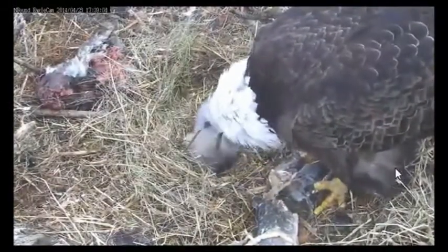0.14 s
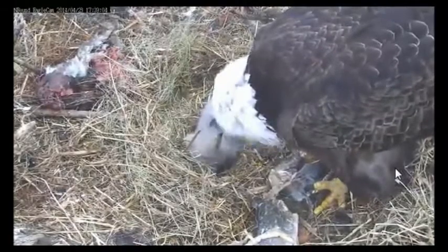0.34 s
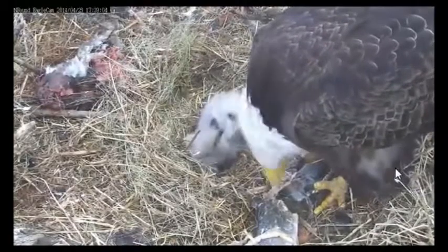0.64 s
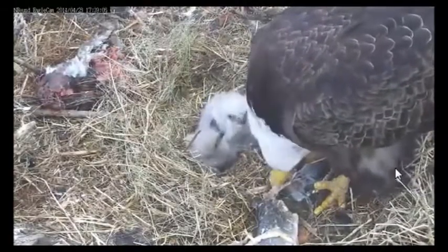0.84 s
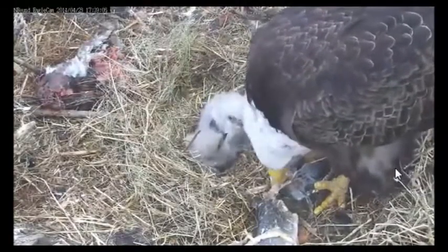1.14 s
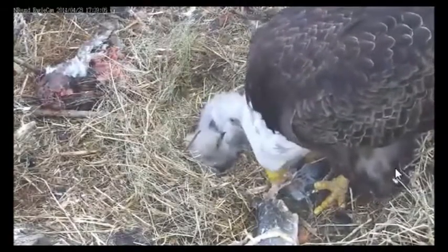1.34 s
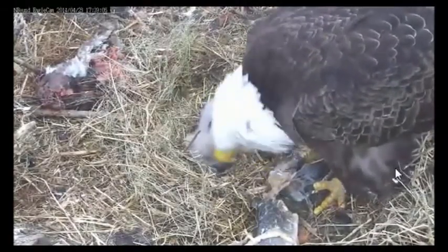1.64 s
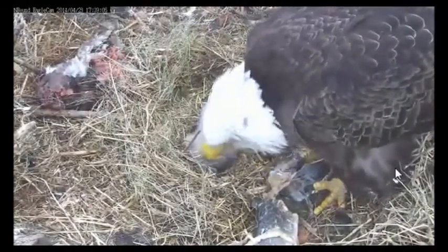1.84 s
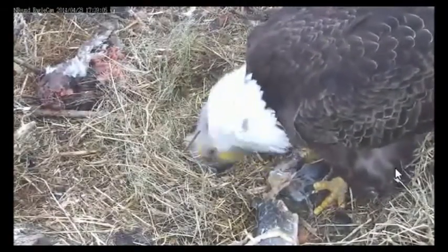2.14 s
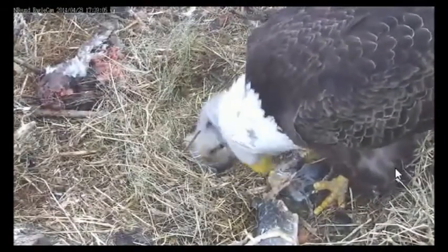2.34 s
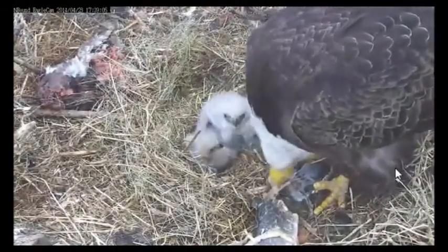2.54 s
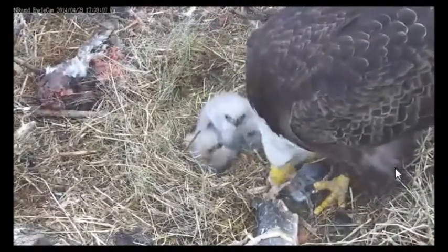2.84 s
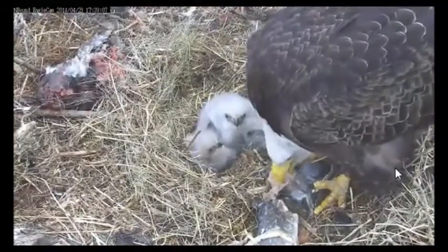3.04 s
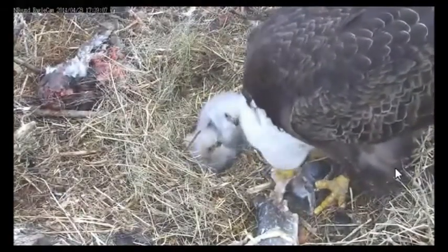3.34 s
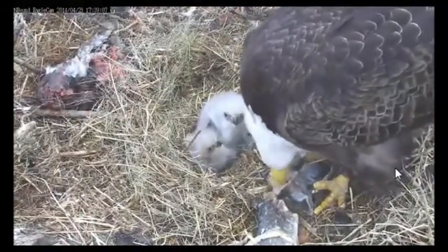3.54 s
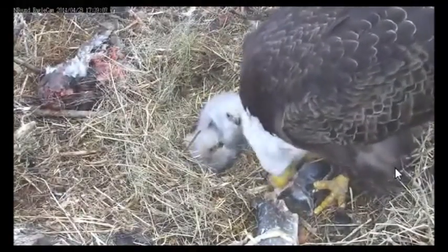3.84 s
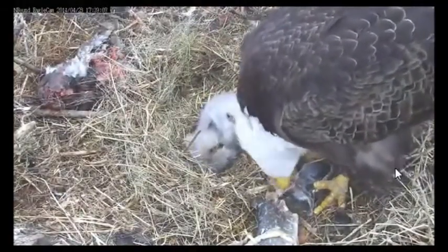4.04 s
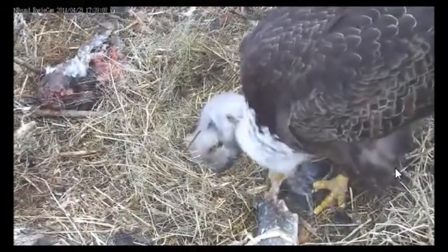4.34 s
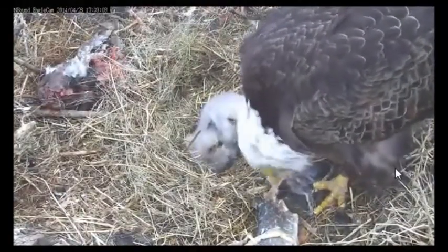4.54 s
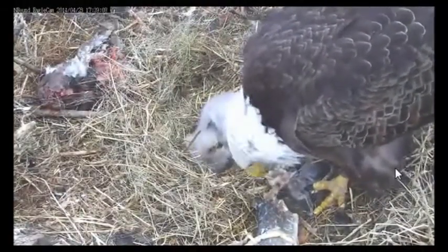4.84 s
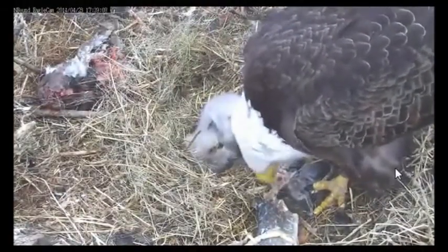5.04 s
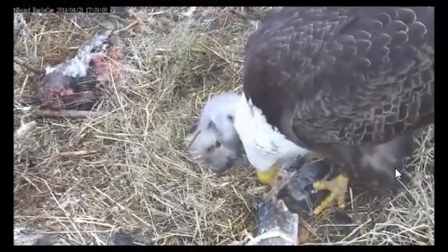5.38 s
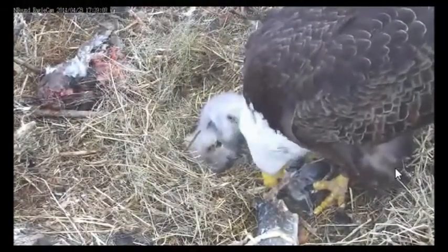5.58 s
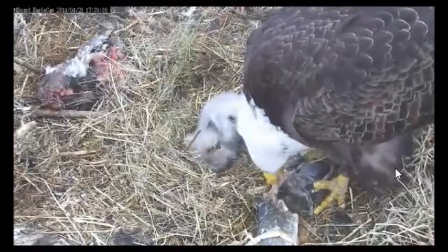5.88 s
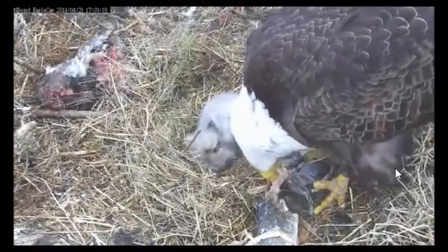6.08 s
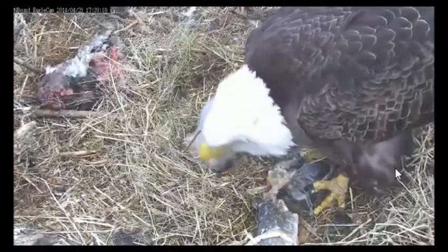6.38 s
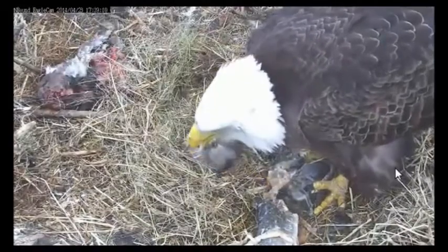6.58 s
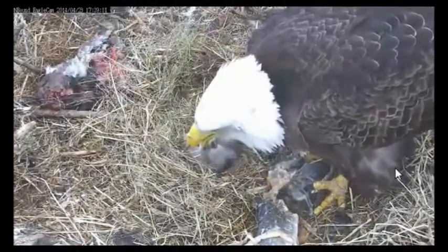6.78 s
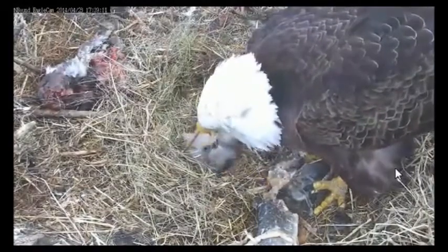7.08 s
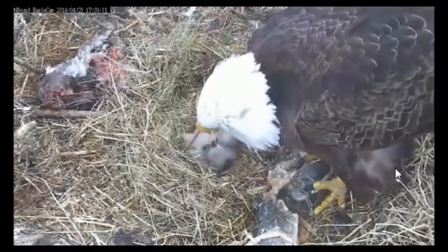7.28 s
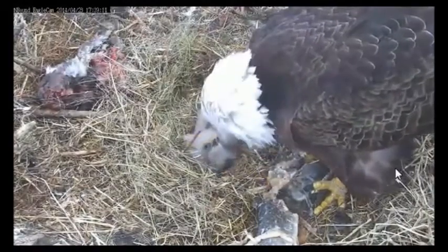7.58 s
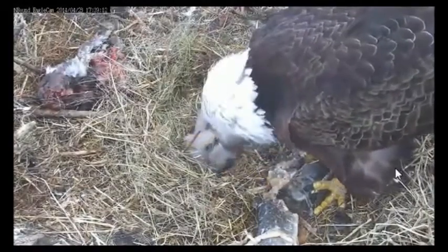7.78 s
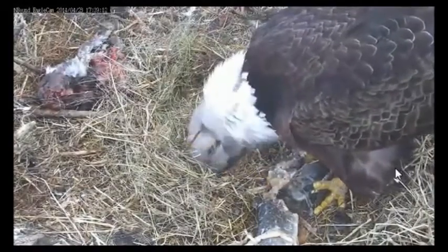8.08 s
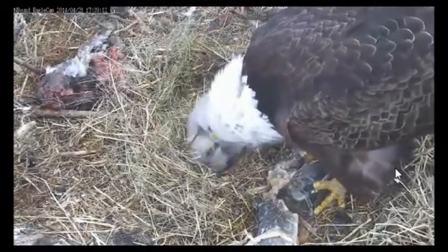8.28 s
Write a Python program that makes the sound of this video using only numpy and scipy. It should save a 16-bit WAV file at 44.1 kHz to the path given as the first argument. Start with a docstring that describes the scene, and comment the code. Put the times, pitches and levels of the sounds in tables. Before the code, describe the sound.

An eagle chick peeps in an outdoor straw nest while wind rumbles on the microphone and branches roar softly. After a short falling peep at the start, high, slightly hoarse calls come about once a second from 0.7 to 5.5 seconds, each rising and then dropping, with a light echo. Lower, wavering peeps follow near 6 and 8 seconds, with a faint one between. Straw rustles throughout, and small sharp snaps of straw or bone are scattered through as the parent tears at food. Gusts hit with dull thumps, strongest around 2.1, 3, 4.4 to 4.9 and 7.5 seconds, and a faint thin whine swells with them. The sound itself ticks now and then from 1.4 seconds, has very brief dips from 2 seconds on, and cuts out once from about 4.6 to 4.8 seconds.

```python
"""An eagle chick peeps in a straw nest while a parent tears at food. From the start, gusts shake the
microphone, branches roar softly, straw rustles and a thin whine swells with the wind. Soon straw and
bone snap, and from 1 s on swirls of air thump the microphone. The link that carries the sound ticks
at 1.4 s, dips from 2 s on and cuts out once near 4.6 s. Near 6 s and 8 s the chick gives lower peeps."""
import sys
import numpy as np
from scipy import signal
from scipy.io import wavfile
from scipy.ndimage import uniform_filter1d

SR = 44100
rng = np.random.default_rng(int(sys.argv[2]) if len(sys.argv) > 2 else 0)


def waveform_to_disk(signal):
    """Save audio, clipped to [-1, 1], as 16-bit WAV at the path in sys.argv[1]."""
    frames = np.transpose(np.atleast_2d(signal))
    scaled = np.clip(frames, -1, 1) * 32767
    samples = np.round(scaled).astype(np.int16)
    wavfile.write(sys.argv[1], SR, samples)


N = 371275
TIME = np.arange(N) / SR
CALM_DB = -27  # gusts are compared with this wind level
# wind on the microphone, in two stretches: t/s, level/dB
GUST_LEVELS = [
    [(0, -32), (.14, -35.5), (.48, -35.5), (.56, -31.5), (1.0, -33.5), (1.25, -29), (1.6, -33),
     (2.04, -27.5), (2.16, -20), (2.35, -22.5), (2.8, -30), (2.92, -23.5), (3.08, -19), (3.2, -23.5),
     (3.6, -30.5), (3.85, -37.5), (4.2, -28.5), (4.39, -27), (4.42, -20.5), (4.55, -20)],
    [(4.78, -20.5), (4.9, -21.5), (4.96, -26.5), (5.3, -29.5), (5.55, -30.5), (5.72, -25), (6.3, -25),
     (7.35, -28.5), (7.44, -21), (7.72, -24), (7.8, -28), (8.05, -24), (8.42, -35.5)],
]
# sounds around the nest: t/s, branch roar/dB, straw rustle/dB
NEST_LEVELS = [(0, -50, -51), (.6, -48.5, -52.5), (1.85, -46.5, -54), (2.1, -49.5, -46.5),
               (2.6, -48.5, -59), (3.1, -47, -50), (3.8, -46.5, -61.5), (4.35, -46, -43),
               (4.95, -47.5, -48.5), (5.6, -41, -48.5), (6.1, -42, -44), (7.1, -43.5, -47.5),
               (8, -44.5, -44.5), (8.42, -43, -45.5)]


def gain_of(db):
    return 10 ** (np.asarray(db) / 20)


def unit_level(x):
    """Scales a signal to an average power of 1."""
    return x / np.sqrt(np.mean(abs(x) ** 2) + 1e-20)


def level_at(points, hz):
    """Reads a curve of f/Hz, level/dB at the given frequencies."""
    f, db = np.transpose(points)
    return np.interp(np.log(hz + 1), np.log(f + 1), db)


def curves(tables):
    """Joins tables that start with t/s and reads each other column at every sample."""
    s, *columns = np.vstack(tables).T
    return [np.interp(TIME, s, column) for column in columns]


def drift(hz, count=N):
    """A smooth random wobble; a higher hz makes it faster."""
    span = int(SR / hz)
    return unit_level(uniform_filter1d(uniform_filter1d(rng.standard_normal(count), span), span))


def add(mix, s, sound):
    mix[round(s * SR):][:len(sound)] += sound


def stereo(mid, side):
    """Left and right share the mid and differ by the side."""
    return np.array([mid + side, mid - side])


def low_pass(x, hz):
    return signal.oaconvolve(x, signal.firwin(511, hz, window=("kaiser", 9), fs=SR)[None], "same")


def noise(spectrum, patchy_db, size=512):
    """Stereo noise shaped by a spectrum, with narrow, lingering loud and soft patches."""
    # how much left and right differ: f/Hz, side compared with mid/dB
    width = [(40, -16.5), (120, -18.5), (400, -40), (1200, -24), (2500, -21.5), (4500, -10.5), (7500, -6.5)]
    hop = size // 4
    frames, hz = N // hop + 5, np.fft.rfftfreq(size, 1 / SR)
    a, b, c, d, patches = rng.standard_normal((frames, len(hz), 5)).T
    patches = unit_level(uniform_filter1d(uniform_filter1d(patches, size=3, axis=0), size=16, axis=1))
    mid, side = a + 1j * b, gain_of(level_at(width, hz))[:, None] * (c + 1j * d)
    shaped = stereo(mid, side) * gain_of(level_at(spectrum, hz)[:, None] + patchy_db * patches)
    return unit_level(signal.istft(shaped, nperseg=size, noverlap=size - hop)[1][:, :N])


def peep(rows, rough, octave_db=-37):
    """Two close voices pulse against each other and turn hoarse when the pitch slides fast."""
    s, hz, db = np.transpose(rows)
    t = np.arange(s[0], s[-1], 1 / SR)
    n = len(t)
    pitch = uniform_filter1d(np.interp(t, s, hz), size=400)
    hoarse = np.clip(abs(np.gradient(pitch)) * SR / 25000, 0, 1) ** 2
    waver = .013 * rough * drift(90, n) + .02 * hoarse * drift(300, n)
    phase = 2 * np.pi * np.cumsum(pitch * (1 + waver)) / SR
    apart_hz = 42 * gain_of(4 * drift(40, n))  # the gap between the voices sets the pulse rate
    strength = np.clip(.5 + .6 * rough + .3 * drift(30, n), 0, 1.1)
    second_voice = strength * np.exp(2j * np.pi * (np.cumsum(apart_hz) / SR + rng.random()))
    flutter = 1 + .55 * rough * (drift(130, n) + .5j * drift(130, n))
    pulse = (1 + second_voice) * flutter
    breath = (.45 * rough ** 2 + .3 * hoarse) * (drift(900, n) + 1j * drift(900, n))
    voice = unit_level(2 * pulse / np.sqrt(4 + abs(pulse) ** 2) + breath)  # loud parts level off
    swell = unit_level(gain_of(3 * rough * drift(45, n)))
    tone = (voice * np.exp(1j * phase)).real + gain_of(octave_db) * (voice * np.exp(2j * phase)).real
    return np.sqrt(2) * gain_of(np.interp(t, s, db)) * swell * tone * signal.windows.tukey(n, .02)


def chick():
    """The chick's clear peeps echo off far trunks, with fainter scraps of peeping among them."""
    # peeps, most rising and then falling: roughness/0-1, rows of (t/s, f/Hz, level/dB)
    high_peeps = [ (.47, [(0, 4610, -41.5), (.066, 4410, -37.5), (.09, 4130, -43), (.128, 2980, -46.5)]),
                  (.5, [(.688, 3040, -40), (.716, 3320, -37), (.77, 3400, -39), (.782, 3860, -51),
                  (.81, 3890, -53), (.83, 4140, -67), (.856, 4170, -40), (.905, 4330, -44),
                  (.925, 4350, -33.5), (.97, 4500, -45), (1.03, 4570, -41), (1.085, 4700, -31.5),
                  (1.11, 4680, -28.5), (1.15, 4570, -39), (1.19, 3220, -40.5)]), (.6, [(1.777, 3096, -31),
                  (1.805, 3350, -41), (1.835, 3493, -31), (1.87, 3460, -42), (1.915, 3610, -44),
                  (1.945, 3790, -40), (1.99, 4070, -57), (2.04, 4440, -45), (2.143, 4590, -42),
                  (2.175, 4760, -36), (2.221, 4820, -41), (2.255, 4690, -40), (2.3, 3200, -42)]),
                  (.7, [(2.792, 3120, -43), (2.822, 3440, -34), (2.866, 3550, -51), (2.9, 3650, -36),
                  (2.94, 3790, -43.5), (2.99, 4050, -42.5), (3.02, 4580, -42.5), (3.076, 4525, -37.5),
                  (3.11, 4570, -37), (3.2, 4790, -44), (3.266, 4680, -34), (3.288, 4610, -46),
                  (3.328, 3150, -40)]), (.7, [(3.806, 3100, -42), (3.828, 3500, -37), (3.873, 3724, -36.5),
                  (3.916, 3720, -32), (3.93, 4170, -38), (3.96, 4280, -48), (4.03, 4720, -44),
                  (4.05, 4740, -46), (4.1, 4760, -37), (4.15, 4850, -40.5), (4.185, 5120, -41),
                  (4.205, 4960, -34), (4.229, 5190, -36.5), (4.26, 4600, -32.5), (4.285, 4496, -43),
                  (4.32, 3110, -45)]), (.5, [(4.998, 3180, -40), (5.018, 3326, -34.5), (5.09, 3520, -38),
                  (5.12, 3550, -36), (5.145, 3820, -36), (5.168, 3740, -35), (5.194, 4200, -42),
                  (5.225, 4470, -35), (5.26, 4350, -37.5), (5.32, 4450, -49), (5.34, 4520, -32.5),
                  (5.36, 4620, -48), (5.436, 4580, -36), (5.466, 3700, -36.5), (5.5, 3033, -44)]),
                  (0.9, [(7.128, 3330, -48), (7.15, 3860, -49), (7.21, 4130, -40.5), (7.228, 4240, -49),
                  (7.252, 4280, -41.5), (7.29, 4300, -46), (7.31, 4420, -48), (7.34, 4440, -46),
                  (7.375, 4100, -47)]), ]
    # lower, wavering peeps, each in rows of: t/s, f/Hz, level/dB
    low_peeps = [
        [(5.848, 3230, -38), (5.885, 3470, -29), (5.903, 3480, -43), (5.93, 3350, -25), (5.975, 3460, -29.5),
         (6.005, 3213, -33.5), (6.069, 3213, -35), (6.109, 3590, -36.5), (6.155, 3450, -31.5),
         (6.19, 3330, -35), (6.215, 3330, -41), (6.24, 3750, -44)],
        [(8.045, 3401, -36.5), (8.083, 3495, -32.5), (8.129, 3398, -36), (8.237, 3440, -35.5),
         (8.37, 3196, -34), (8.404, 3120, -43)],
    ]
    # the overtone an octave above each low peep: level compared with the main tone/dB
    low_octaves = [-17, -28]
    # faint scraps: t/s, length/s, first f/Hz, last f/Hz, level/dB
    scraps = [(0.063, 0.13, 4690, 4640, -47.5), (0.922, 0.16, 3480, 3430, -53),
              (3.053, 0.073, 3090, 3600, -45), (4.26, 0.037, 2950, 3470, -43),
              (4.297, .07, 3415, 3520, -42), (7.35, 0.042, 3730, 3870, -45)]
    # echoes from far trunks: delay/s, level/dB
    echoes = [(.11, -23), (.16, -27), (.24, -30)]
    near, faint = np.zeros((2, SR + 2 * N))  # one second of lead-in
    for rough, rows in high_peeps:
        add(near, 1 + rows[0][0], peep(rows, rough))
    for rows, octave_db in zip(low_peeps, low_octaves):
        add(near, 1 + rows[0][0], peep(rows, rough=.38, octave_db=octave_db))
    for s, length, from_hz, to_hz, db in scraps:
        add(faint, 1 + s, peep([(0, from_hz, db), (length, to_hz, db)], rough=1.0))
    for delay, db in echoes:
        add(faint, delay, gain_of(db) * near[:SR + N])
    return (near + faint)[SR:SR + N]


def tree_echoes(sound):
    """Trunks and branches around the nest throw back many small echoes."""
    per_second, fade_s = 1500, 0.28
    t = np.arange(SR // 2) / SR
    bounces = rng.choice([-1., 1.], (2, len(t))) * (rng.random((2, len(t))) < per_second / SR)
    tail = bounces * (t > .006) * gain_of(-60 * t / fade_s)
    tail = stereo(tail[0], 0.17 * tail[1])
    return signal.fftconvolve(sound[None], tail / np.linalg.norm(tail[0]), axes=1)[:, :N]


def gusts():
    """Swirling air shakes the microphone in lumps; stronger gusts sound duller and wider."""
    # tone of the rumble: f/Hz, relative level/dB
    spectrum = [(25, -41), (60, -18), (120, -5.5), (250, -1), (400, -5), (600, -12.5), (800, -22.5),
                (1000, -51.5), (1500, -43)]
    dulling, widening = 0.63, 0.91  # dB per dB of wind above calm
    roar_lift, quiet_roar_db = 0.58, -47  # the upper rumble also grows with the branches' roar
    wind_db, = curves(GUST_LEVELS)
    roar_db, _ = curves([NEST_LEVELS])
    over_db = wind_db - CALM_DB
    air = noise(spectrum, patchy_db=3.36, size=2048)
    slow_level = np.sqrt(uniform_filter1d((air ** 2).mean(0), size=6000))
    air = unit_level(air / slow_level)
    upper = signal.sosfiltfilt(signal.butter(2, 480, "high", fs=SR, output="sos"), air)
    air = air + upper * (gain_of(roar_lift * (roar_db - quiet_roar_db) - dulling * over_db) - 1)
    lumps = unit_level(gain_of(2 * drift(hz=71) + 1.1 * drift(hz=25.5) + .5 * drift(hz=16)))
    side = (air[0] - air[1]) / 2 * gain_of(widening * over_db)
    return stereo(air.mean(0), side) * lumps * gain_of(wind_db)


def branches():
    """Wind in the branches makes a soft, uneven roar."""
    # tone of the roar: f/Hz, relative level/dB
    spectrum = [(600, 3), (1000, -6), (1300, -6), (1700, -1.5), (2100, -5), (2500, -16), (3200, -21)]
    roar_db, _ = curves([NEST_LEVELS])
    roar = noise([(300, -73)] + spectrum + [(5000, -67.5)], patchy_db=2.74)
    return roar * gain_of(roar_db + 1.13 * drift(hz=30.6))


def straw():
    """Straw rustles in bursts and crackles in tiny grains."""
    # tone of the rustle: f/Hz, relative level/dB
    spectrum = [(1500, -14), (2500, 0.5), (3600, 8.5), (4800, 3), (5800, 0.5), (6800, 1), (7500, -26)]
    per_second, grain_s = 140, 0.0077
    _, straw_db = curves([NEST_LEVELS])
    grains = gain_of(5 * np.minimum(rng.exponential(1, N), 4)) * (rng.random(N) < per_second / SR)
    crackle = 1 + 0.36 * signal.lfilter([1], [1, -np.exp(-1 / (grain_s * SR))], grains)
    hiss = noise([(500, -70)] + spectrum, patchy_db=2.5)
    return hiss * unit_level(crackle * gain_of(3 * drift(hz=22))) * gain_of(straw_db)


def whine():
    """Three thin, fuzzy tones stutter on and off and swell with the wind."""
    # tones of the whine: f/Hz, relative level/dB
    tones = [(3895, 16.5), (7790, 5), (11690, -9)]
    wobbly_time = np.cumsum(1 + .005 * drift(hz=120)) / SR
    mid = sum(gain_of(db) * np.sin(2 * np.pi * hz * wobbly_time) for hz, db in tones)
    side = sum(gain_of(db - 14.5) * np.cos(2 * np.pi * hz * wobbly_time) for hz, db in tones)
    side *= drift(hz=80)
    stutter = unit_level(gain_of(8 * np.tanh(1.5 * drift(hz=110) - .2)))
    swell = gain_of(-74.5 + 1.15 * (curves(GUST_LEVELS)[0] - CALM_DB))
    return np.sqrt(2) * stereo(mid, side) * stutter * swell


def snaps():
    """Straw or bone breaks: a short ring with a bright edge, a crack, then a scratchy rustle."""
    # snaps: t/s, level/dB, ring f/Hz, brightness/dB
    breaks = [(0.343, -33, 5400, -27), (0.548, -21, 3160, -37), (1.07, -28.5, 4230, -4.5),
              (1.781, -25.5, 3160, -12), (2.002, -22.5, 3900, -8.5), (2.2807, -28, 3390, -25),
              (3.045, -28, 3900, -29), (3.1185, -22.5, 3570, -2), (3.164, -28.5, 3930, -14),
              (3.9193, -27, 4070, -1), (3.945, -22.5, 4170, -1), (4.046, -28, 3280, -36),
              (4.245, -22, 3420, -23), (4.313, -27, 3220, -30), (4.35, -30.5, 3530, 1.5),
              (4.4352, -24, 3060, -10), (4.475, -28, 3330, -27), (4.867, -23, 4000, -30),
              (3.827, -32, 4700, -26), (5.812, -29, 4300, -28), (5.825, -26, 4000, -22),
              (6.025, -36, 5200, -16), (5.883, -26, 3870, -14), (5.898, -29, 3650, -10),
              (6.2, -24.5, 4230, -11), (6.4633, -23, 4050, -15), (6.998, -23.5, 4100, -20),
              (7.455, -19.5, 3530, -7), (7.475, -19.5, 3900, -23), (7.7963, -25, 3530, -0.5),
              (7.833, -29, 3700, -4), (7.9384, -29, 3760, -25), (7.998, -23, 3970, -13),
              (8.052, -34.5, 4430, 2)]
    ring_s, crack_s, rustle_s = 0.002, 0.0025, 0.017
    t, out = np.arange(3000) / SR, np.zeros(N + 3000)
    noises = rng.standard_normal((len(breaks), 3, len(t)))
    rise = 1 - np.exp(-(t / .0009) ** 2)
    edge = 1.8 * np.sin(2 * np.pi * 6600 * t) * np.exp(-t / 0.0012)
    crack_and_rustle = gain_of(-4 - 7.1 * t / crack_s) + gain_of(-14 - 7 * t / rustle_s)
    treble = signal.butter(2, [5000, 7400], "band", fs=SR, output="sos")
    for (s, db, hz, bright_db), (hiss, fizz, scratch) in zip(breaks, noises):
        ring = np.sin(2 * np.pi * hz * t) * np.exp(-t / ring_s)
        around_ring = signal.butter(2, [hz / 1.18, hz * 1.22], "band", fs=SR, output="sos")
        grain = unit_level(gain_of(2.6 * unit_level(uniform_filter1d(scratch, size=90))))
        scrape = 2 * signal.sosfilt(around_ring, hiss * grain)
        scrape += gain_of(bright_db + 9.5) * signal.sosfilt(treble, fizz * grain)
        add(out, s, gain_of(db) * rise * (ring + edge * gain_of(bright_db) + scrape * crack_and_rustle))
    return out[:N]


def thumps():
    """A strong swirl of air knocks the thin skin inside the microphone, which swings briefly."""
    # swirls that hit: t/s, level/dB, swing f/Hz
    hits = [(1.046, -17, 375), (1.202, -18, 370), (2.087, -11.5, 193), (2.118, -7.5, 335),
            (2.172, -9.5, 269), (2.244, -8, 295), (3.556, -22.5, 424), (5.688, -20, 442), (2.424, -12, 265),
            (2.94, -15, 305), (2.973, -13, 324), (3.008, -14.5, 328), (3.029, -23, 293), (3.065, -14, 403),
            (3.084, -14, 345), (3.139, -19, 324), (4.174, -21.5, 447), (4.415, -10, 286), (4.431, -9, 407),
            (4.481, -5.5, 234), (4.792, -12, 297), (4.817, -14.5, 406), (4.893, -9.5, 250),
            (7.434, -23, 327), (7.509, -11.5, 310), (7.694, -12.5, 344)]
    knock_db, knock_s = -24, 0.0015
    t, out = np.arange(1500) / SR, np.zeros((2, N + 1500))
    for k, (s, db, hz) in enumerate(hits):
        swing = np.sin(2 * np.pi * hz * t) * (t / 0.004) * np.exp(1 - t / 0.0036)
        knock = np.sin(2 * np.pi * 2.3 * hz * t) * (t / knock_s) * np.exp(1 - t / knock_s)
        lean = stereo(1, 0.083 * (-1) ** k)[:, None]  # a little left, then a little right
        out[:, round(s * SR):][:, :len(t)] += gain_of(db) * (swing + gain_of(knock_db) * knock) * lean
    return out[:, :N]


def link_ticks():
    """The wave jumps and quickly settles back, heard as a tick."""
    # jumps in the wave: t/s, height/full scale
    jumps = [(1.3818, -0.027), (2.4821, 0.11), (3.772, 0.022), (4.4278, 0.03), (4.5617, 0.032),
             (4.7618, 0.062), (4.8619, 0.15), (6.5213, -0.036)]
    settle_s, spikes = 0.00068, np.zeros((2, N))
    for k, (s, height) in enumerate(jumps):
        spikes[:, round(s * SR)] = height * stereo(1, 0.3 * (-1) ** k)
    return signal.lfilter([1], [1, -np.exp(-1 / (settle_s * SR))], spikes)


def link_dips():
    """The level dips briefly; gives the change in dB."""
    # dips in the link: start t/s, end t/s, level/dB
    dips = [(2.043, 2.065, -14.5), (2.076, 2.086, -10), (2.095, 2.107, -18), (2.114, 2.122, -14),
            (2.127, 2.142, -15), (2.832, 2.847, -16), (2.998, 3.007, -9), (4.116, 4.142, -14.5),
            (4.378, 4.405, -11), (4.914, 4.941, -12), (7.385, 7.398, -10), (7.409, 7.43, -17.5),
            (7.539, 7.567, -14.5)]
    ramp_s = 0.0037
    return sum(db * np.clip(np.minimum(TIME - start, end - TIME) / ramp_s + .5, 0, 1)
               for start, end, db in dips)


def link_dropout():
    """The link cuts out at once and later comes back within a millisecond; gives the change in dB."""
    # the gap in the link: start t/s, end t/s, level/dB
    gap = (4.5618, 4.7619, -28)
    start, end, db = gap
    return db * (TIME > start) * np.clip((end - TIME) / .0006, 0, 1)


def scene():
    """Peeps and snaps echo in the trees, over wind and straw."""
    near = chick() + snaps()
    return near + gain_of(-6.5) * tree_echoes(near) + gusts() + thumps() + branches() + straw()


def record(dry):
    """The microphone loses the high treble; a thin whine joins in, and the link after it ticks, dips and cuts
    out."""
    dropout_db = link_dropout()
    sound = low_pass(dry, hz=7550) * gain_of(link_dips() + dropout_db)
    sound += whine() * gain_of(1.6 * dropout_db)  # the whine skips the dips but sinks in the dropout
    return low_pass(sound + link_ticks(), hz=15800)


dry = scene()
out = record(dry)
waveform_to_disk(out)
```